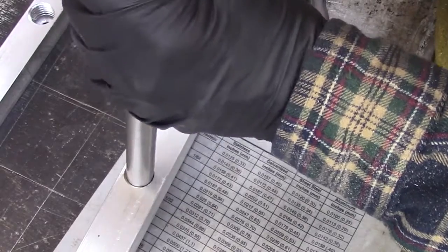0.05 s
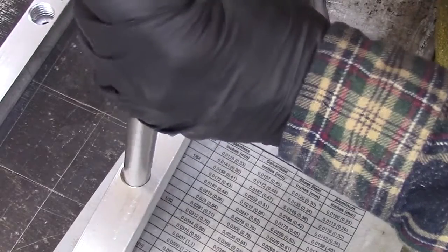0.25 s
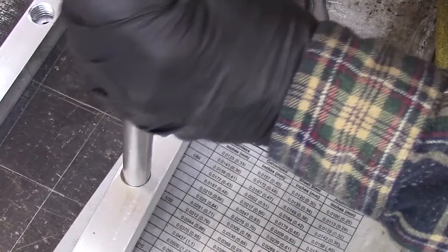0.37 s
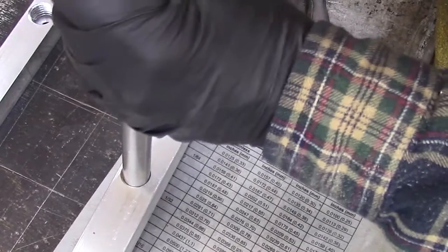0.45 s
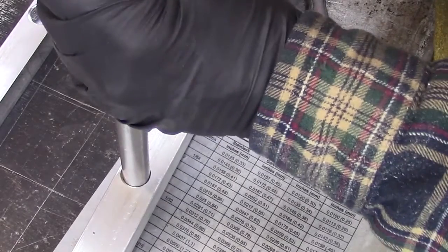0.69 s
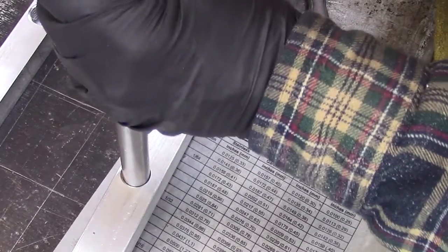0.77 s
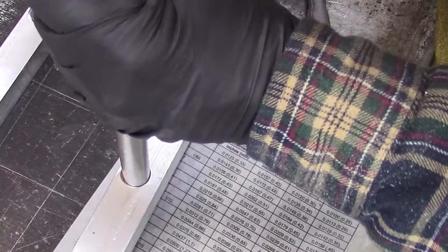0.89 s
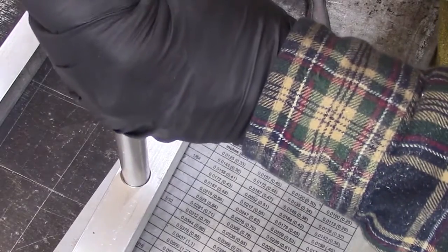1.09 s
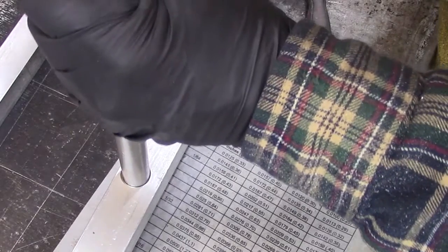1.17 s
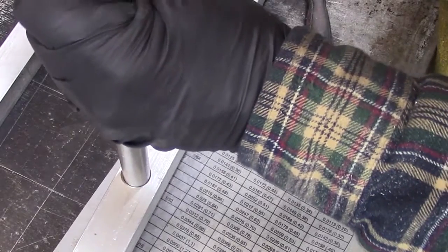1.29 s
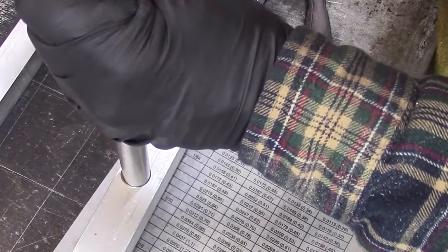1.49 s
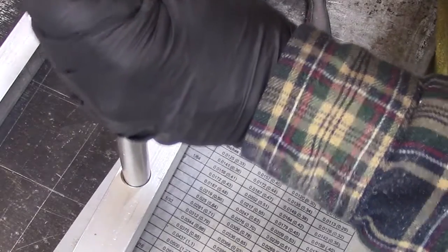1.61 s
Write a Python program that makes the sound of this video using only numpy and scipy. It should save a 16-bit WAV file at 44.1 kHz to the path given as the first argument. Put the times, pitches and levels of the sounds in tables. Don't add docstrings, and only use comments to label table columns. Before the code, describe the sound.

Hammer blows on a steel tube, three loud ringing metallic clanks in a reverberant machine shop

```python
import sys
import numpy as np
from scipy import signal
from scipy.fft import rfft, irfft
from scipy.io import wavfile
from scipy.ndimage import map_coordinates

SR = 44100
rng = np.random.default_rng(int(sys.argv[2]) if len(sys.argv) > 2 else 0)


def volts_from_db(level):
    exponent = np.asarray(level, float) / 20
    return 10 ** exponent


def dump_mix(stems):
    frames = np.atleast_2d(stems).T
    limited = np.clip(frames, -1, 1)
    pcm = np.round(limited * 32767).astype(np.int16)
    wavfile.write(sys.argv[1], SR, pcm)


N = 72765
BLOW_N = SR
BLOW_T_S = np.arange(BLOW_N) / SR

# t/s, level/dB, tilt/(dB/octave), hall level/dB, contact time/s
BLOWS = [
    (-.2, 0, 3, -1.5, .0002),
    (0.2109, 6, 1, -0.5, 0.0005),
    (.8356, -5.5, 0, 2, 0.00077),
    (1.2179, 0.5, 1, -3.5, 0.00045),
]
# t/s, level/dB, tilt/(dB/octave)
REBOUNDS = [
    (0.228, 4, 3),
    (0.8405, -24, -16),
    (0.848, -33, -19),
    (1.2285, -15, -15),
]

# f/Hz, density/(dB per Hz)
CLANK_SPECTRUM = [(88, -57), (150, -2), (745, -10.5), (1020, -7.5), (2810, -3.5), (3100, -2), (6020, -12),
                  (11700, -13.5), (16000, -15.5)]
# f/Hz, T60/s
CLANK_T60_S = [(300, 0.064), (2000, 0.15), (6000, 0.03), (14000, 0.043)]

TUBE_HZ = [2290, 2930, 3100, 3146, 3833, 4603, 5464, 6377, 7273, 8374, 9296, 10290, 11503, 3190]
TUBE_T60_S = [.05, .03, .3, .32, .45, .4, .2, .2, .14, .2, .18, .4, .1, .045]
TUBE_LEVEL_DB = [(3, -4, -12, -33), (-26, -5, -30, -26), (-12, -13, -7, -30), (-3, -8.5, -28, -11),
                 (-10, -15.5, -11, -22), (-15.5, -9, -24.5, -16), (-9, -22, -13, -23.5),
                 (0.5, -14, -13.5, -39), (-29, -17, -10, -26.5), (-10, -9, -11, -8.5), (-20, -9, -41, -44),
                 (-41.5, -34, -64, -70), (-19, -8.5, -34, -14), (-6, -22, 3, -19)]

BENCH_HZ = [181, 259, 295, 550, 641, 697, 759, 828, 990, 1142, 1235, 1501]
BENCH_T60_S = [.42, .4, .28, .24, .23, .22, .2, .2, .28, .28, .28, .28]
BENCH_LEVEL_DB = [(-29, -14, -7, -15), (2, -7, 3, -23), (-24, -4, -2, -15), (-1.5, -6, 1, -4),
                  (5, 1, 2.5, 0.5), (0, 5.5, 0, -1.5), (-17, -10.5, 4, 3.5), (-20, -11, -7, 1),
                  (-6, -17, -13.5, -34), (-9, -5, -11.5, -13.5), (-17, -15.5, -17, -18.5),
                  (-27, -26, -34, -6)]

# f/Hz, density/(dB per Hz)
HALL_SPECTRUM = [(41, -90), (70, -37), (256, 8), (462, -6.5), (635, -2.5), (3110, -12.5), (11100, -24.5),
                 (14300, -36), (16000, -92.5)]
# f/Hz, T60/s
HALL_T60_S = [(150, 0.41), (600, 0.36), (2000, 0.53), (5000, 0.56), (10000, 0.35), (15000, 0.29)]
# f/Hz, side over mid/dB
HALL_SIDE_DB = [(60, -33), (200, -49.5), (600, -28.5), (2000, -23), (5000, -16), (12000, -19.5)]

# f/Hz, density/(dB per Hz)
HUM_SPECTRUM = [(30, -44), (60, -22), (120, -3.5), (200, 4.5), (400, -5), (1000, -10), (2000, -25.5),
                (4000, -58.5)]
# f/Hz, density/(dB per Hz)
HISS_SPECTRUM = [(800, -3), (2000, 10), (4500, 0.5), (7000, 7), (9500, -6), (13000, -10.5), (16000, -5)]
# f/Hz, side over mid/dB
HUM_SIDE_DB = [(60, -17), (110, -24), (200, -37.5), (380, -18.5), (700, -19.5), (1290, -17), (2380, -16),
               (4400, -17), (8120, -12), (15000, -16)]

CLANK_DB, REBOUND_CONTACT_S = 1, 0.0002
BEAT_HZ, BEAT_GROWS_S = 32.4, 0.03
TUBE_BEAT, BENCH_BEAT = 1, 0.61
BENCH_BLOOM_S = 0.022
HALL_RISE_S, HALL_RISE_CYCLES = 0.011, 3.8
TUBE_IN_HALL_DB, BENCH_IN_HALL_DB = -12, -6.5
LOW_CUT_HZ = 160
HUM_DB, HISS_DB = -40.5, -52
HOLD_DB, SENSE_S, DUCK_S, CLIMB_DB_PER_S = -11, 0.0077, 0.0023, 161.5
CLIP_TOP, CLIP_HARD = 0.88, 18
TOP_HZ = 15500


def along(points, hz):
    f, v = np.transpose(points)
    return np.interp(np.log(hz + 1), np.log(f + 1), v)


def add(bus, x, t_s):
    i = round(t_s * SR)
    x = x[..., max(0, -i):N - i]
    start = max(0, i)
    bus[..., start:start + x.shape[-1]] += x


def rising(rise_s):
    return 1 - np.exp(-BLOW_T_S / rise_s)


def left_right(mid, side):
    return np.array([mid + side, mid - side])


def dying_noise(spectrum, t60_s, tilt_db, rise_cycles=0):
    lead_n = 512
    noise = rng.standard_normal((2, BLOW_N + lead_n))
    hz, t, z = signal.stft(noise, SR, nperseg=256)
    t = t - lead_n / SR
    colour = volts_from_db(along(spectrum, hz) + tilt_db * np.log2((hz + 50) / 3000))
    colour = colour / np.sqrt(np.mean(colour ** 2))
    decay_s = np.clip(along(t60_s, hz), 0.015, None)
    z = z * colour[:, None] * volts_from_db(-60 * t / decay_s[:, None])
    if rise_cycles:
        z = z * (1 - np.exp(-np.clip(t, 0, None) * (hz[:, None] + 50) / rise_cycles))
    mid, side = signal.istft(z, SR, nperseg=256)[1][:, lead_n:lead_n + BLOW_N]
    width = volts_from_db(along(HALL_SIDE_DB, np.fft.rfftfreq(BLOW_N, 1 / SR)))
    return left_right(mid, irfft(rfft(side) * width, BLOW_N))


def ring(hz, t60_s, level_db, onset, beat_depth):
    hz, t60_s, level_db = np.c_[hz], np.c_[t60_s], np.c_[level_db]
    phase = rng.uniform(0, 2 * np.pi, hz.shape)
    knots = rng.standard_normal((len(hz), 128))
    beat = np.array([map_coordinates(k, [BLOW_T_S * BEAT_HZ]) for k in knots])
    depth = np.clip(beat_depth, 0, 0.8) * (1 - np.exp(-BLOW_T_S / BEAT_GROWS_S))
    swing = 1 + depth * np.tanh(beat)
    decay = volts_from_db(level_db - 60 * BLOW_T_S / t60_s)
    partials = decay * swing * np.sin(2 * np.pi * hz * BLOW_T_S + phase)
    return onset * partials.sum(axis=0)


def clank(tilt_db, contact_s):
    noise = dying_noise(CLANK_SPECTRUM, CLANK_T60_S, tilt_db)
    return volts_from_db(CLANK_DB) * rising(contact_s) * noise


def tube_ring(blow, contact_s):
    level_db = np.array(TUBE_LEVEL_DB)[:, blow]
    return ring(TUBE_HZ, TUBE_T60_S, level_db, rising(contact_s), TUBE_BEAT)


def bench_ring(blow):
    level_db = np.array(BENCH_LEVEL_DB)[:, blow]
    return ring(BENCH_HZ, BENCH_T60_S, level_db, rising(BENCH_BLOOM_S) ** 2, BENCH_BEAT)


def hall_tail(tilt_db, hall_db):
    noise = dying_noise(HALL_SPECTRUM, HALL_T60_S, tilt_db, HALL_RISE_CYCLES)
    return volts_from_db(hall_db) * rising(HALL_RISE_S) * noise


def hall_echo(tube, bench):
    flat = [(20, 0), (20000, 0)]
    tail = rising(HALL_RISE_S) * dying_noise(flat, HALL_T60_S, 0)
    tail = tail / np.linalg.norm(tail[0])
    sent = volts_from_db(TUBE_IN_HALL_DB) * tube + volts_from_db(BENCH_IN_HALL_DB) * bench
    return signal.fftconvolve(sent[None], tail, axes=1)[:, :BLOW_N]


def hammer_blows():
    bus = np.zeros((2, N))
    for blow, (t_s, level_db, tilt_db, hall_db, contact_s) in enumerate(BLOWS):
        tube = tube_ring(blow, contact_s)
        bench = bench_ring(blow)
        direct = tube + bench + clank(tilt_db, contact_s)
        hall = hall_tail(tilt_db, hall_db) + hall_echo(tube, bench)
        add(bus, volts_from_db(level_db) * (direct + hall), t_s)
    for t_s, level_db, tilt_db in REBOUNDS:
        add(bus, volts_from_db(level_db) * clank(tilt_db, REBOUND_CONTACT_S), t_s)
    low_cut = signal.butter(3, LOW_CUT_HZ, 'high', fs=SR, output='sos')
    return signal.sosfilt(low_cut, bus)


def steady_noise(spectrum, level_db):
    hz = np.fft.rfftfreq(N, 1 / SR)
    width = volts_from_db(along(HUM_SIDE_DB, hz))
    gain = volts_from_db(along(spectrum, hz)) * np.array([np.ones_like(hz), width])
    mid, side = irfft(rfft(rng.standard_normal((2, N))) * gain, N)
    noise = left_right(mid, side)
    return volts_from_db(level_db) * noise / np.sqrt(np.mean(noise ** 2) + 1e-20)


def machine_hum():
    return steady_noise(HUM_SPECTRUM, HUM_DB)


def air_hiss():
    return steady_noise(HISS_SPECTRUM, HISS_DB)


def scene():
    return hammer_blows() + machine_hum() + air_hiss()


def smooth(x, time_s):
    n = time_s * SR
    return signal.lfilter([1 / n], [1, 1 / n - 1], x)


def gain_control(x):
    sensed_db = 10 * np.log10(smooth(np.mean(x ** 2, axis=0), SENSE_S) + 1e-12)
    need_db = np.minimum(0, HOLD_DB - sensed_db)
    climb_db = CLIMB_DB_PER_S * np.arange(N) / SR
    gain_db = np.minimum(0, np.minimum.accumulate(need_db - climb_db) + climb_db)
    return x * volts_from_db(smooth(gain_db, DUCK_S))


def overload(x):
    return x / (1 + np.abs(x / CLIP_TOP) ** CLIP_HARD) ** (1 / CLIP_HARD)


def roll_off(x):
    return signal.sosfilt(signal.butter(12, 16310, fs=SR, output="sos"), x)


def record(dry):
    x = overload(gain_control(dry))
    mix = signal.sosfilt(signal.cheby1(8, 0.5, TOP_HZ, fs=SR, output='sos'), x)
    return roll_off(mix)


dry = scene()
out = record(dry)
dump_mix(out)
```